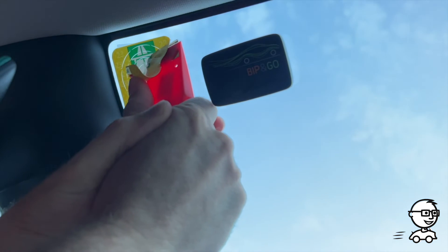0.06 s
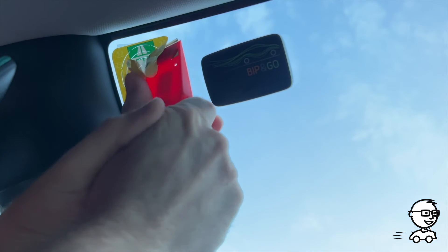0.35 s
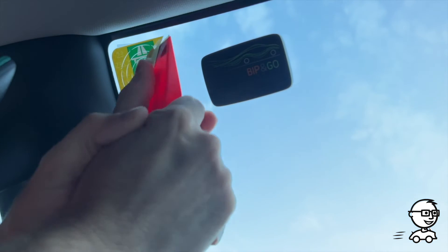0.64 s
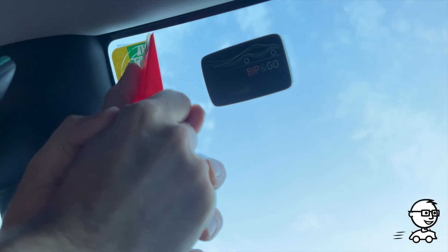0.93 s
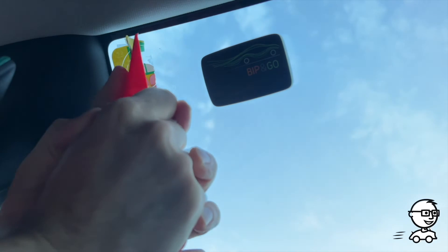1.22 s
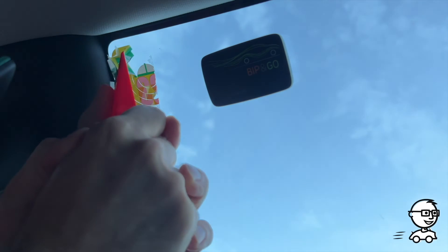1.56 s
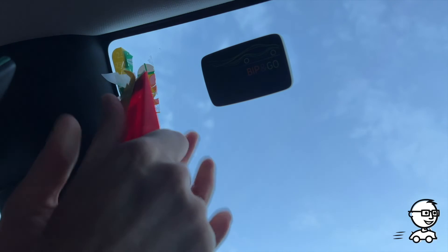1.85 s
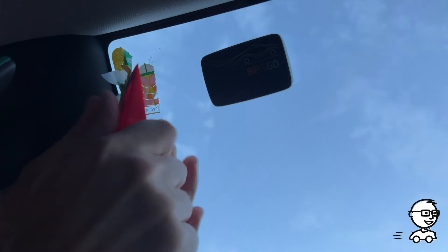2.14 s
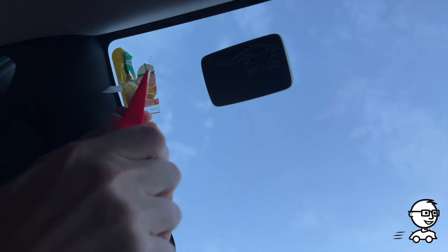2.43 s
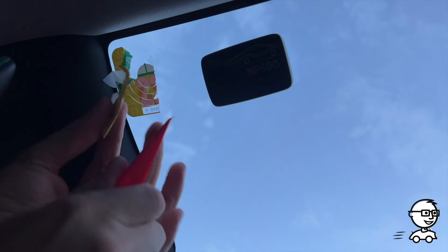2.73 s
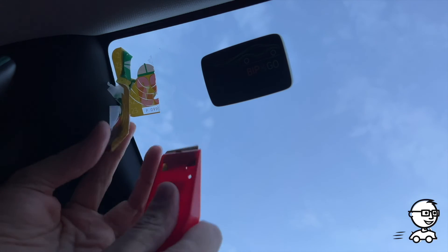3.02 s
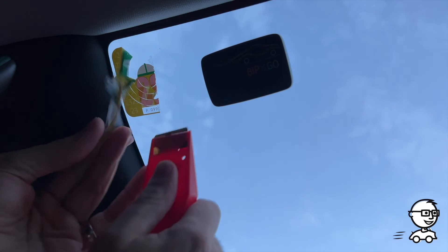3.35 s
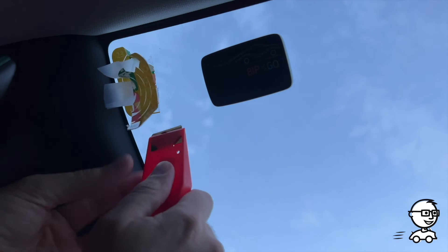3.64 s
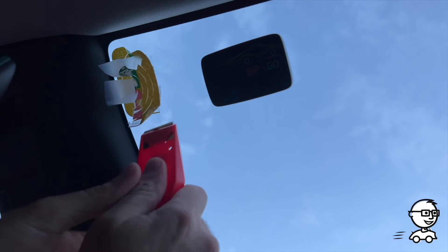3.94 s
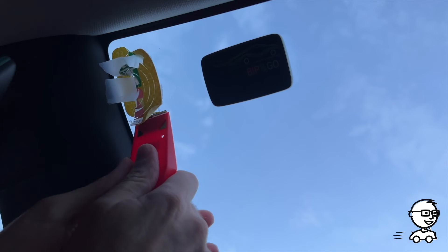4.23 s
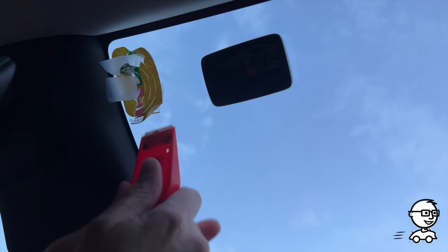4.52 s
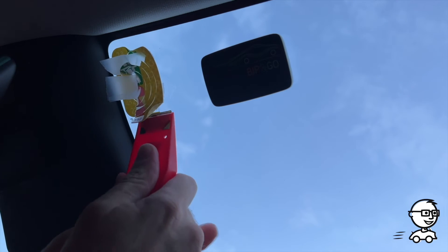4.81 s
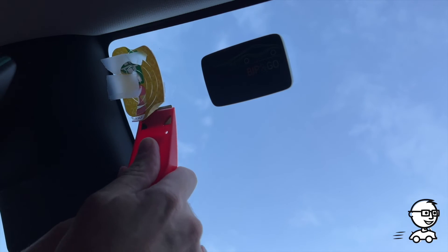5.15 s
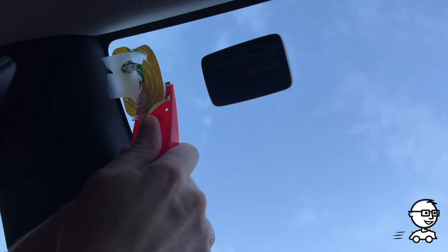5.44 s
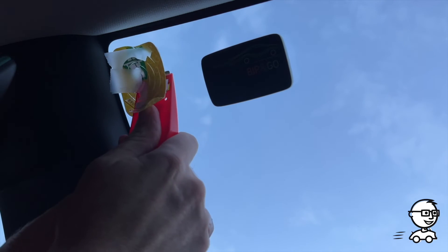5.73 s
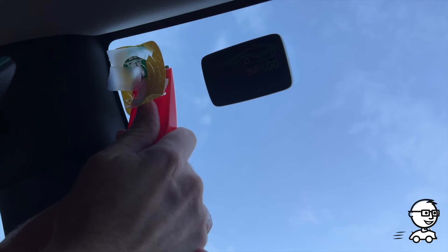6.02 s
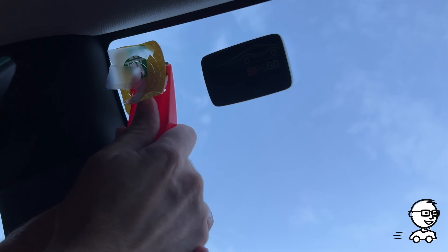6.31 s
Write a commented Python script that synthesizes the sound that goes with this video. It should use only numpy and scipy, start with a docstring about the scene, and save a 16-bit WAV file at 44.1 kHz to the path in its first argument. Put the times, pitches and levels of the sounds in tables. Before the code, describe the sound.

A plastic scraper picks a sticker off a car windscreen, with small scratchy rasps, brittle snaps and dull thumps over a low cabin hum.

```python
"""Inside a car, one microphone close to the hands: a plastic scraper lifts a sticker off the windscreen.
From the start, over the small cabin's low boom and faint fan, the blade slips in short rasps and tears
through brittle glue, which snaps with the foil, loudest near 1.8 s. Midway, fingers swish over the foil.
From about 5 s the hand bears down: the pane thumps, and finally the blade judders on the glass."""
import sys
import numpy as np
from scipy import signal
from scipy.fft import rfft, irfft, next_fast_len
from scipy.io import wavfile
from scipy.ndimage import uniform_filter1d, map_coordinates

SR = 44100
rng = np.random.default_rng(int(sys.argv[2]) if len(sys.argv) > 2 else 0)


def put_to_file(sound):
    """Save the sound as 16-bit audio at rate SR, in the file named by the first command-line argument."""
    columns = np.atleast_2d(sound).T  # one column per channel
    safe = np.clip(columns, -1, 1)
    whole_steps = np.round(safe * 32767)
    wavfile.write(sys.argv[1], SR, whole_steps.astype(np.int16))


N = 285327
TIME = np.arange(N) / SR
RING_TIME = np.arange(SR // 4) / SR  # seconds after an impact

# spectrum of brittle glue cracking: (frequency [Hz], level [dB])
CRACK_SPECTRUM = [(3500, -29), (5500, -6.5), (7100, 2.5), (8500, -1.5), (10500, -1), (12500, -11.5),
                  (15000, -7)]
# resonances of the scraper's tip: (frequency [Hz], width [Hz], level [dB])
TIP_MODES = [(965, 70, -6), (1230, 104, -1), (1720, 95, -5), (1882, 48, 2.5), (1990, 1200, -7)]


def amp(db):
    """Decibels to gain."""
    return 10 ** (np.asarray(db) / 20)


def unit_rms(x):
    """x at rms 1."""
    return x / np.sqrt(np.mean(x ** 2) + 1e-20)


def unit_burst(x):
    """x with its loudest few milliseconds at rms 1."""
    return x / np.sqrt(uniform_filter1d(x ** 2, 256).max() + 1e-20)


def curve_at(points, hz):
    """(frequency, value) points read on a log frequency axis."""
    knots_hz, values = np.transpose(points)
    return np.interp(np.log(hz + 1), np.log(knots_hz + 1), values)


def wobble(rate):
    """A smooth random curve, rate knots a second."""
    return map_coordinates(rng.standard_normal(int(N * rate / SR) + 4), [TIME * rate])


def filtered(x, response):
    """x through a filter given as a function of frequency."""
    size = next_fast_len(len(x) + SR // 4)
    return irfft(rfft(x, size) * response(np.fft.rfftfreq(size, 1 / SR)), size)[:len(x)]


def noise(spectrum, swell=1):
    """Coloured noise of rms 1, its source shaped by swell."""
    return unit_rms(filtered(swell * rng.standard_normal(N), lambda hz: amp(curve_at(spectrum, hz))))


def coloured(x, spectrum, size=2048):
    """x through a minimum-phase filter with a spectrum of (frequency [Hz], level [dB]) points."""
    cepstrum = irfft(np.log(amp(curve_at(spectrum, np.fft.rfftfreq(size, 1 / SR)))))
    cepstrum[1:size // 2] *= 2
    cepstrum[size // 2 + 1:] = 0
    return signal.fftconvolve(x, irfft(np.exp(rfft(cepstrum))))[:len(x)]


def resonated(x, modes):
    """x through a body's resonances, alternating in sign."""
    def response(hz):
        return sum((-1) ** k * amp(db) * 1j * hz * width / (centre ** 2 - hz ** 2 + 1j * hz * width)
                   for k, (centre, width, db) in enumerate(modes))
    return filtered(x, response)


def add(track, start_s, sound):
    """Mix a sound into the track at start_s."""
    part = track[round(start_s * SR):][:len(sound)]
    part += sound[:len(part)]


def cabin_click(direct_db, early_db=3, early_s=0.018):
    """A click at the microphone: direct sound, dense echoes off the near glass, a short tail."""
    # the cabin's reverberation: (frequency [Hz], time to fall 60 dB [s])
    decay_times = [(500, 0.13), (1800, 0.12), (7000, 0.12), (14000, 0.086)]
    hz, t, bins = signal.stft(rng.standard_normal(len(RING_TIME)), SR, nperseg=128)
    decay = amp(-60 * t / curve_at(decay_times, hz)[:, None])
    tail = signal.istft(bins * decay, SR, nperseg=128)[1][:len(RING_TIME)]
    tail *= amp(early_db * np.exp(-RING_TIME / early_s))
    return tail / np.linalg.norm(tail) + amp(direct_db) * (RING_TIME == 0)


def pressure_db(time_s):
    """How hard the hand bears on the scraper; hardest at the end."""
    # the hand's pressure: (time [s], level [dB])
    pressures = [(0.0, 3), (0.7, -1), (2.5, 0.5), (4.7, 0), (5.1, 3.5), (5.6, 5), (5.9, 5), (6.3, 6)]
    return np.interp(time_s, *np.transpose(pressures))


def cabin_background(boom_db=-38, rumble_db=-55, murk_db=-65, air_db=-64, fan_db=-1, evenness=0.82):
    """Boom, rumble and handling murk grow with the hand's pressure, under air and wavering fan tones."""
    # spectra of the cabin's noises, lowest first: (frequency [Hz], level [dB])
    boom_spectrum = [(7, -6), (11, -2.5), (19, -12), (26, -10), (32, 7), (37, -17), (47, -14.5), (62, -20),
                     (100, -79.5)]
    rumble_spectrum = [(35, -20), (55, -10.5), (72, 9), (95, 9.5), (125, 3), (160, -11), (260, -37)]
    murk_spectrum = [(130, -12.5), (165, 0), (184, 2.5), (210, -3.5), (245, 1.5), (290, -9.5), (340, -4),
                     (480, -15.5), (900, -34)]
    air_spectrum = [(200, -8.5), (380, -19.5), (520, -16), (640, -19), (750, -9), (860, -22), (1200, -23),
                    (3000, -35), (14000, -43.5)]
    # the fan's tones: (frequency [Hz], level [dB])
    fan_tones = [(339.1, -74), (387.6, -73), (775.2, -84.5), (974.4, -80)]
    boom = noise(boom_spectrum)
    boom_power = np.abs(uniform_filter1d(boom ** 2, 6000))
    low = amp(boom_db) * unit_rms(boom / boom_power ** (evenness / 2))  # fairly even from cycle to cycle
    low += amp(rumble_db) * noise(rumble_spectrum)
    low += amp(murk_db) * noise(murk_spectrum)
    fan = sum(amp(db + fan_db) * unit_rms(np.sin(2 * np.pi * hz * TIME + 0.67 * wobble(9)))
              for hz, db in fan_tones)
    return amp(pressure_db(TIME)) * low + amp(air_db) * noise(air_spectrum) + fan


def glue_ticks(per_second=4, level_db=-68.5, spread_db=5):
    """Stray specks of glue part with faint crackles at random moments."""
    out = np.zeros(N)
    for when, size in rng.random((round(per_second * N / SR), 2)):
        tick = unit_burst(coloured(cabin_click(direct_db=-5), CRACK_SPECTRUM))
        add(out, when * N / SR, amp(level_db + spread_db * (2 * size - 1.5)) * tick)
    return out


def foil_swishes(gain_db=-1, width_octaves=0.21, grain_db=4, patchy_db=2):
    """Each brush of fingers on foil swells and fades, a grainy hiss in a band around its own centre."""
    # brushes of fingers and loose foil: (middle [s], length [s], level [dB], centre [Hz])
    brushes = [(2.75, .35, -70.5, 9900), (2.994, 0.15, -62.5, 10100), (3.198, .18, -64, 9600),
               (3.357, 0.14, -64, 8240), (3.54, 0.1, -65.5, 8050), (3.716, 0.19, -62.5, 9300),
               (4.558, 0.19, -70, 9500), (4.846, 0.2, -71.5, 7700), (5.01, 0.12, -70.5, 8300),
               (5.827, 0.089, -67, 11300), (6.107, .25, -69.5, 9600)]
    hiss = unit_rms(rng.standard_normal(N) * amp(grain_db * wobble(400)))
    hz, t, bins = signal.stft(hiss, SR, nperseg=256)
    power = 0
    for middle_s, length_s, db, centre_hz in brushes:
        offset = np.log2((hz[:, None] + 1) / centre_hz) / width_octaves
        band = 1 / (1 + offset ** 2 + 0.0095 * offset ** 6)
        swell = np.exp(-(2 * (t - middle_s) / length_s) ** 2)
        power += amp(db + gain_db) ** 2 * band / band.mean() * swell
    patches = uniform_filter1d(rng.standard_normal(bins.shape), 4, axis=0)
    patches = unit_rms(uniform_filter1d(patches, 12, axis=1))
    return signal.istft(bins * np.sqrt(power) * amp(patchy_db * patches), SR, nperseg=256)[1][:N]


def glue_tearing(gain_db=1, creep_db=-73, grain_db=5, rise_s=0.086, fall_s=0.28):
    """Glue tears in fine grains under the creeping blade, swelling with each push."""
    # pushes of the blade through the glue: (start [s], length [s], level [dB])
    pushes = [(0.55, 0.84, -73.5), (1.2, 0.47, -71), (2.0, 0.97, -74), (3.092, 0.58, -73),
              (5.278, 0.33, -64.5), (5.733, 0.21, -65.5)]
    power = amp(creep_db) ** 2
    for start_s, length_s, db in pushes:
        age = TIME - start_s
        push = np.clip(np.minimum(age / rise_s, 1 - (age - length_s) / fall_s), 0, 1)
        power += (amp(db) * push) ** 2
    # spectrum of tearing glue: (frequency [Hz], level [dB])
    glue_spectrum = [(300, 7.5), (900, 0), (1700, 1), (2600, 3.5), (4500, -1.5), (6300, -3.5), (9000, -4),
                     (14000, -8)]
    return amp(gain_db) * np.sqrt(power) * noise(glue_spectrum, swell=amp(grain_db * wobble(500)))


def rubbing(flutter_db=1.1):
    """Tearing glue and swishing foil flutter in level and take a ragged colour from the cabin's echoes."""
    rub = (glue_tearing() + foil_swishes()) * amp(flutter_db * wobble(28))
    echo = cabin_click(direct_db=-6.5, early_db=10)
    return signal.fftconvolve(rub, echo / np.linalg.norm(echo))[:N]


def windscreen_thumps(pane_hz=95, t60_s=0.18, attack_s=0.0085, knock_db=-17):
    """The windscreen's low mode swings when the hand lurches, with a dull knock above it."""
    # the hand's weight jolting the pane: (time [s], level [dB])
    jolts = [(5.035, -40), (5.206, -38), (5.369, -30), (6.287, -31)]
    knock_spectrum = [(80, -2), (220, -19), (340, -12), (700, -37), (2000, -32)]
    envelope = amp(-60 * RING_TIME / t60_s) * (1 - np.exp(-RING_TIME / attack_s))
    swing = unit_burst(np.sin(2 * np.pi * pane_hz * RING_TIME) * envelope)
    out = np.zeros(N)
    for time_s, db in jolts:
        knock = unit_burst(coloured(cabin_click(direct_db=-6), knock_spectrum))
        add(out, time_s, amp(db) * (swing + amp(knock_db) * knock))
    return out


def blade_judders(first_stick_s=0.031, next_stick_s=0.016, attack_s=0.00067, scatter_db=2, scuff_db=-9):
    """The pressed blade sticks and jumps, once or in a run; each jump rings hollow modes and scuffs."""
    # the blade catching on the glass: (time [s], level [dB], jumps [count])
    runs = [(5.508, -48, 1), (5.804, -52.5, 1), (5.881, -43, 1), (6.134, -43, 1), (6.275, -43.5, 2),
            (6.375, -43.5, 5)]
    # modes of the blade pressed on the glass: (frequency [Hz], level [dB], time to fall 60 dB [s])
    blade_modes = [(490.7, -5, 0.19), (596, 4, 0.073), (690, 0.5, 0.076), (790, -35, 0.039),
                   (923, -14.5, 0.22)]
    scuff_spectrum = [(250, -26), (480, -1), (750, 7), (1100, -9), (1500, -6), (3000, -36)]
    attack = 1 - np.exp(-RING_TIME / attack_s)
    out = np.zeros(N)
    for time_s, db, jumps in runs:
        for jump in range(round(jumps)):
            ring = 0
            for hz, mode_db, t60_s in blade_modes:
                decay = amp(mode_db + scatter_db * rng.normal() - 60 * RING_TIME / t60_s)
                ring += decay * np.sin(2 * np.pi * hz * RING_TIME)
            scuff = unit_burst(coloured(cabin_click(direct_db=-6.5), scuff_spectrum))
            add(out, time_s, amp(db) * (unit_burst(ring * attack) + amp(scuff_db) * scuff))
            time_s += next_stick_s if jump else first_stick_s
    return out


def blade_slips(body_db=-1, grip_db=-1, tip_db=-5, edge_db=-29, bite=4.4, length_s=0.017, catches=5):
    """A release and a few quick catches ring the plastic handle and tip; under pressure the edge bites."""
    # the blade slipping forward: (time [s], level [dB], body pitch [Hz])
    slips = [(0.087, -59, 1580), (0.207, -55.5, 1470), (0.637, -54.5, 1370), (0.663, -62, 1300),
             (0.751, -52.5, 1340), (0.839, -59.5, 990), (1.103, -57.5, 1240), (1.153, -56, 1280),
             (2.504, -49.5, 1420), (4.917, -59, 1580), (4.989, -51.5, 1660), (5.047, -49, 2080),
             (5.204, -45.5, 1720), (5.367, -44.5, 1720), (6.285, -46, 2800), (6.419, -60.5, 1920)]
    # resonances of the scraper's handle: (frequency [Hz], width [Hz], level [dB])
    handle_modes = [(475, 153, 3.5), (785, 130, 4), (1300, 210, -2.5), (1910, 140, -46), (2800, 87, -13)]
    # spectrum of the biting edge: (frequency [Hz], level [dB])
    edge_spectrum = [(1200, -22), (2400, -1), (3300, -2), (4200, 0), (5500, -6), (9000, -7), (14000, -13)]
    out = np.zeros(N)
    for time_s, db, hz in slips:
        impulses = 1. * (RING_TIME == 0)
        for when, size in rng.random((catches, 2)):
            add(impulses, length_s * when, np.array([0.6 * (0.5 + size)]))
        rasp = signal.fftconvolve(impulses, cabin_click(direct_db=-1.5))[:len(RING_TIME)]
        grip_mode = [(hz, 0.45 * hz, 0)]  # grip and blade angle shift the handle's strongest resonance
        body = resonated(rasp, handle_modes)
        body += amp(grip_db) * resonated(resonated(rasp, grip_mode), grip_mode)
        body += amp(tip_db) * resonated(rasp, TIP_MODES)
        edge = amp(edge_db + bite * pressure_db(time_s)) * unit_burst(coloured(rasp, edge_spectrum))
        add(out, time_s, amp(db) * (amp(body_db) * unit_burst(body) + edge))
    return out


def sticker_snaps(gain_db=-1, sharp_db=0.5, flap_db=-2.5, tip_db=2, delay_s=0.001):
    """Each break is one impulse shaking a foil flap and the scraper's tip; bright ones have less flap."""
    # glue and foil letting go: (time [s], level [dB], brightness [dB], flap pitch [Hz], tip ring [dB])
    breaks = [(0.3745, -63, 1, 6100, -7), (0.5719, -55, -4, 2940, 0.5), (1.2785, -40.5, 4, 5650, -23),
              (1.559, -64, 7.5, 3500, -7), (1.8044, -30, 2, 3780, -4), (2.077, -48.5, 0, 4300, -4),
              (2.7113, -59, -1.5, 4200, -4.5), (3.198, -52.5, -3.5, 4800, -10),
              (3.2695, -45.5, 6, 4750, -26), (3.3997, -47, -2, 4460, -1.5), (3.5222, -59, -6, 5400, 8),
              (3.8924, -61.5, -9, 3400, -9), (5.5634, -49.5, -4.5, 4500, 0), (5.781, -61.5, 11, 9000, -6),
              (5.7994, -51, -2, 3460, -7), (5.9359, -52, -5.5, 3740, -6.5), (6.113, -57, 13, 9700, -27),
              (6.211, -45.5, 8.5, 4900, -9)]
    # spectrum of a snap's sharp top: (frequency [Hz], level [dB])
    sharp_spectrum = [(8000, -7.5), (10500, -1.5), (12000, -1.5), (15000, -5)]
    out = np.zeros(N)
    for time_s, db, bright_db, flap_hz, ring_db in breaks:
        click = cabin_click(direct_db=-5)
        crack = unit_burst(coloured(click, CRACK_SPECTRUM))
        sharp = unit_burst(coloured(cabin_click(direct_db=-10.5), sharp_spectrum))
        flap_mode = [(flap_hz, 0.45 * flap_hz, 0)]
        flap = unit_burst(resonated(resonated(click, flap_mode), flap_mode))
        snap = crack + amp(sharp_db + bright_db) * sharp - amp(flap_db - bright_db) * flap
        # a flap radiates little below its pitch
        snap = signal.sosfilt(signal.butter(4, 0.83 * flap_hz, 'highpass', fs=SR, output='sos'), snap)
        snap += amp(tip_db + ring_db) * unit_burst(resonated(cabin_click(direct_db=-0.5), TIP_MODES))
        add(out, time_s + delay_s, amp(db + gain_db) * snap)
    return out


def scene():
    """Everything heard from one spot close to the hands."""
    scraping = sticker_snaps() + blade_slips() + blade_judders() + windscreen_thumps() + rubbing()
    return (scraping + cabin_background() + glue_ticks())[None]


def record(dry):
    """The microphone's mono channel cuts off steeply at the top of its band."""
    top_hz = 15800
    return filtered(dry[0], lambda hz: 1 / np.sqrt(1 + (hz / top_hz) ** 300))[None]


dry = scene()
out = record(dry)
put_to_file(out)
```